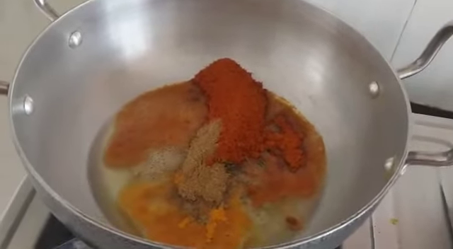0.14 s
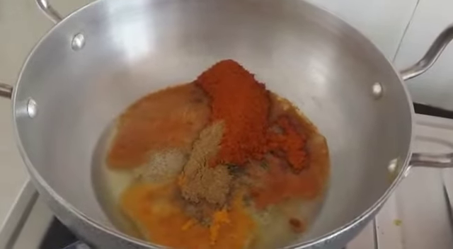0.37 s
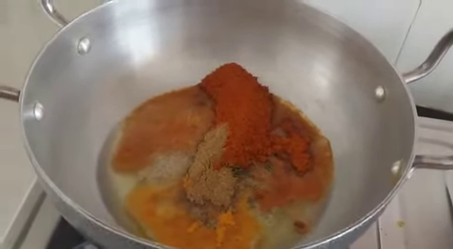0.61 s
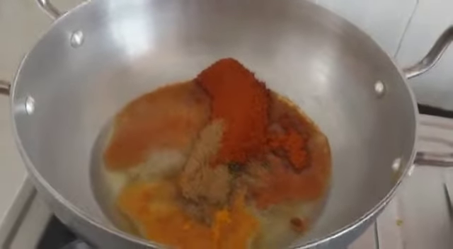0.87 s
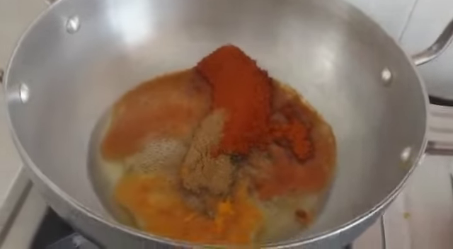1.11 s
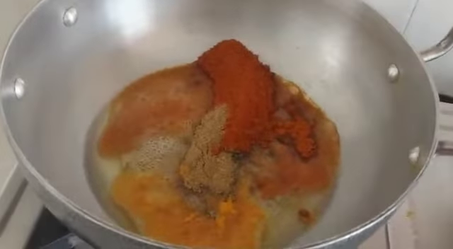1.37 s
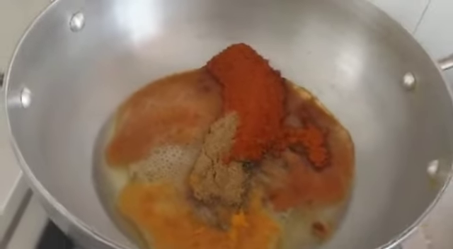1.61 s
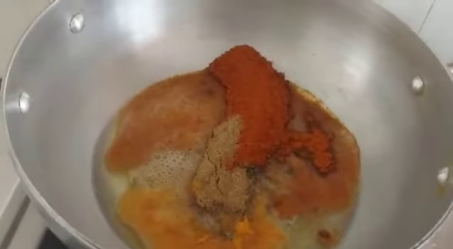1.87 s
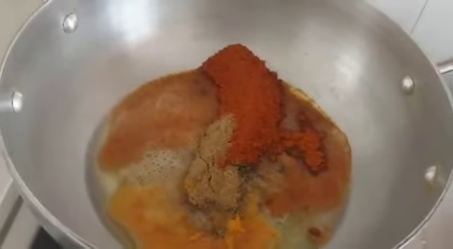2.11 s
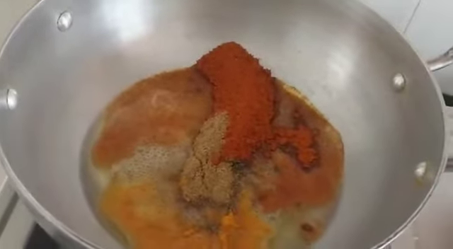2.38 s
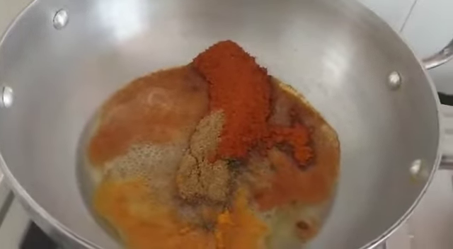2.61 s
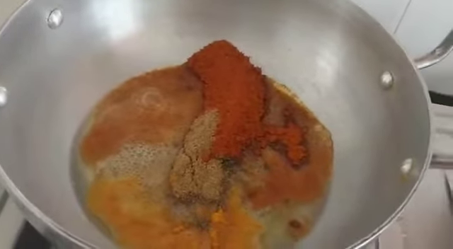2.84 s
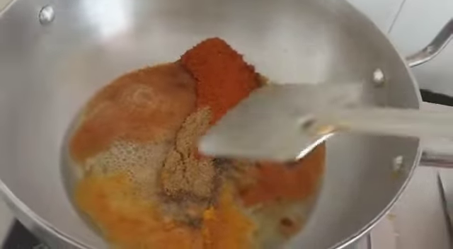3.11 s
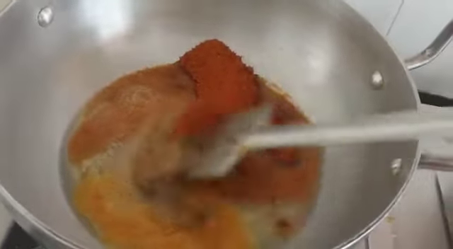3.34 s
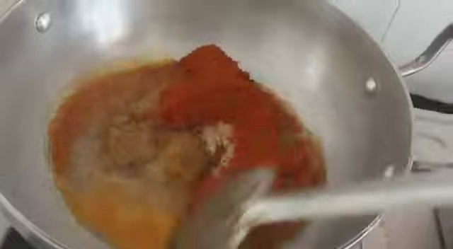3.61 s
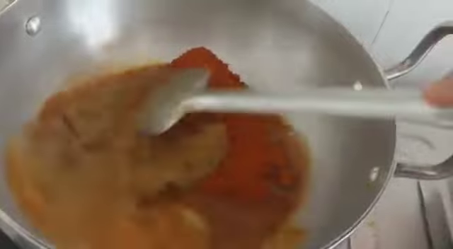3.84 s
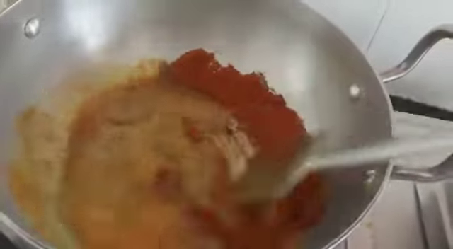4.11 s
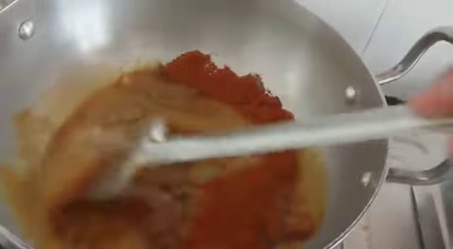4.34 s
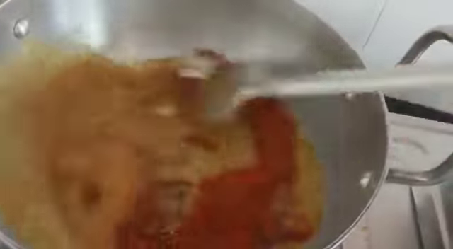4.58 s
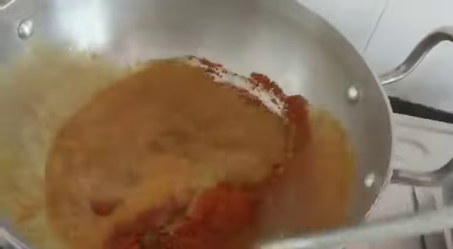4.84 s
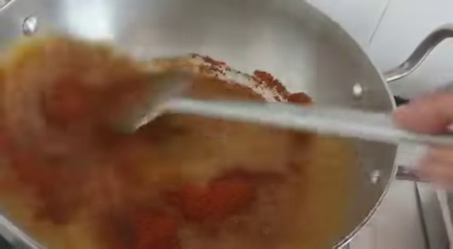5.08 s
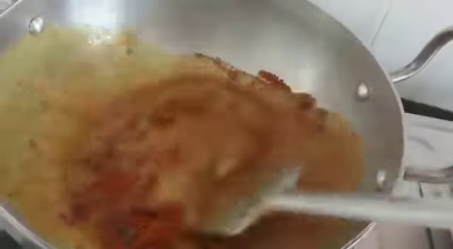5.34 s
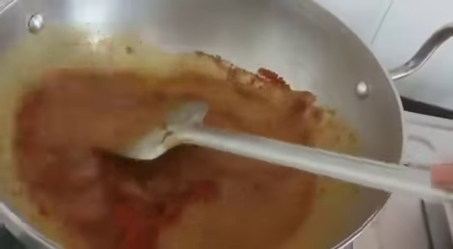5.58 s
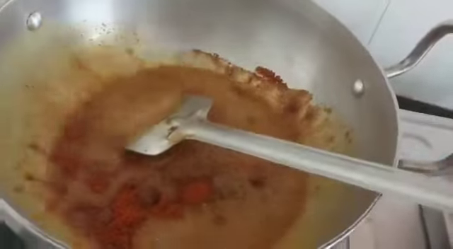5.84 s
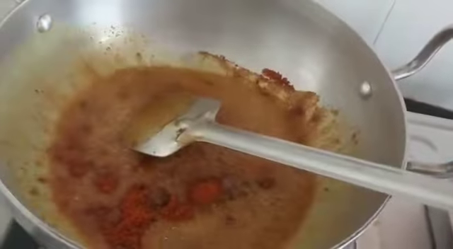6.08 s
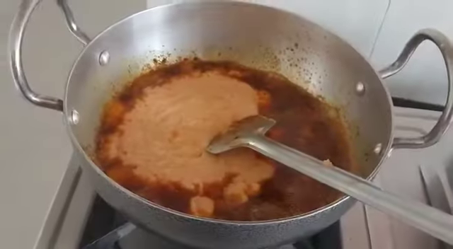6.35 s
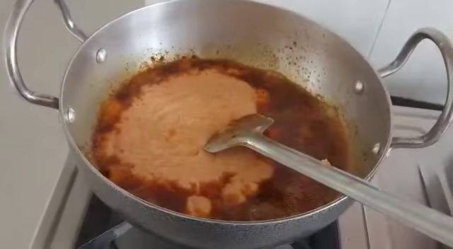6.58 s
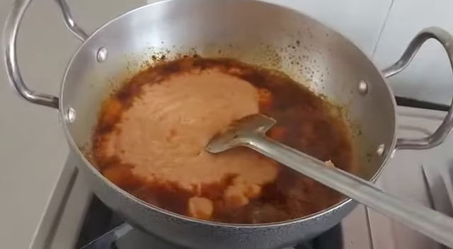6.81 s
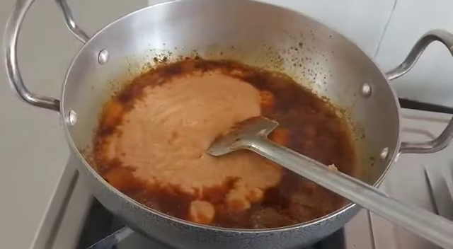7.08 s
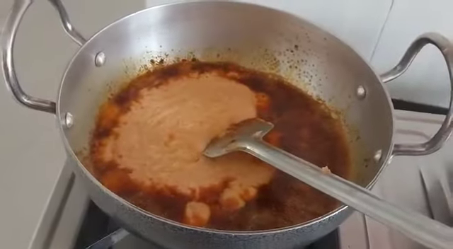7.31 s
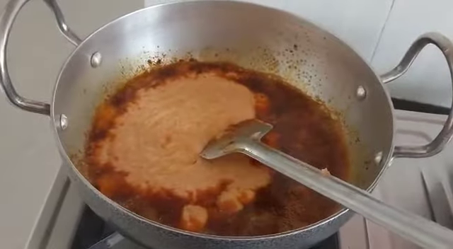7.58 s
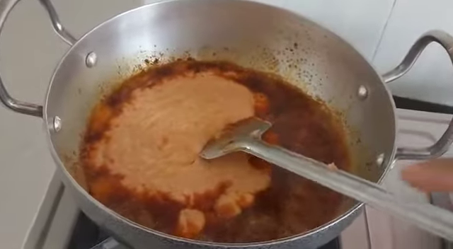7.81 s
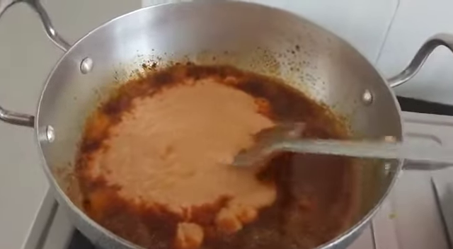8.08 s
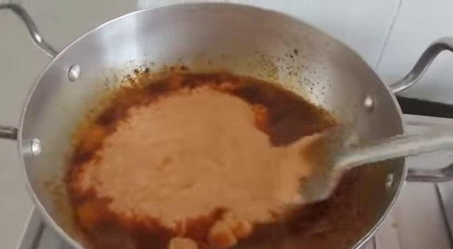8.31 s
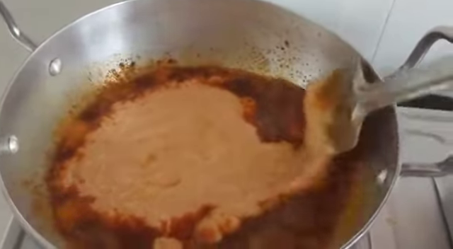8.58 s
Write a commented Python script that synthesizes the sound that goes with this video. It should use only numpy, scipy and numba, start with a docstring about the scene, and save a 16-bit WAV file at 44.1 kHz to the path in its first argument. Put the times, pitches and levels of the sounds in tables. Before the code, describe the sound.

Sparse oil bubbles pop in a metal pan, then a steel spatula clanks and scrapes as spices sizzle loudly, settling into a quieter simmer.

```python
"""Ground spices fry in hot oil in a thin steel pan: at first single bubbles pop as short rising rings,
while puffs of air thump the left microphone of a phone as damped swings. From 3.3 s a steel spatula
strikes, stirs and scrapes, ringing the pan's modes, and the oil hisses up as shaped noise and clicks.
From 6.15 s a wet paste simmers more quietly, its modes damped further and its hiss recoloured.
Throughout, a gas burner rumbles as low noise and a hard kitchen echoes the pan with decaying noise."""
import sys
import numpy as np
from scipy import signal
from scipy.fft import rfft, irfft, next_fast_len
from scipy.io import wavfile
from numba import njit

SR = 44100
rng = np.random.default_rng(int(sys.argv[2]) if len(sys.argv) > 2 else 0)


def store_wav(level_fs):
    """Save 16-bit WAV to argv[1]."""
    pcm = np.round(np.clip(np.atleast_2d(level_fs), -1, 1) * 32767)
    wavfile.write(sys.argv[1], SR, pcm.T.astype(np.int16))


def elevation(decibels):
    """Turn decibel levels (scalar or array-like) into linear amplitude ratios."""
    levels = np.asarray(decibels, float)
    return 10 ** (levels / 20)


N = 383229
TIME = np.arange(N) / SR
PASTE_FROM_S = 6.15


def curve(table, column=1):
    """One column of a table, interpolated along time."""
    rows = np.array(table)
    return np.interp(TIME, rows[:, 0], rows[:, column], left=-99)


def colour(x, spectrum, causal=False):
    """Filter x by a spectrum (Hz, dB); causal keeps attacks sharp (minimum phase)."""
    size = 2 * next_fast_len(x.shape[-1] // 2 + 1)
    hz, db = np.transpose(spectrum)
    log_hz = np.log(np.fft.rfftfreq(size, 1 / SR) + 1)
    gain = elevation(np.interp(log_hz, np.log(hz), db))
    if causal:
        cepstrum = irfft(np.log(gain), size)[:size // 2]
        cepstrum[1:] *= 2
        gain = np.exp(rfft(cepstrum, size))
    return irfft(rfft(x, size) * gain, size)[..., :x.shape[-1]]


def unit(x):
    """Scale to rms 1."""
    return x / np.sqrt(np.mean(x ** 2))


def walk(rate_per_s):
    """Wandering value around 0: normal random levels joined by cosine blends."""
    knots = rng.standard_normal(int(N / SR * rate_per_s) + 2)
    place = TIME * rate_per_s
    k = place.astype(int)
    blend = (1 - np.cos(np.pi * (place - k))) / 2
    return knots[k] * (1 - blend) + knots[k + 1] * blend


def pair(likeness):
    """Two noises with this correlation."""
    mid, side = rng.standard_normal((2, N))
    c = np.clip(likeness, 0, 1)
    return np.sqrt((1 + c) / 2) * mid + np.sqrt((1 - c) / 2) * side * np.array([[1], [-1]])


def crackle(clicks_per_s, spread_db):
    """Random clicks at rms 1, most small and a few large."""
    where, size, sign = rng.random((clicks_per_s * N // SR, 3)).T
    size_db = spread_db * np.minimum(-np.log(size + 1e-9), 3)
    out = np.zeros(N)
    out[(where * N).astype(int)] = (sign - 0.5) * elevation(size_db)
    return unit(out)


def add(out, start_s, wave):
    """Mix a short wave in at start_s."""
    i = int(start_s * SR)
    out[..., i:i + wave.shape[-1]] += wave[..., :N - i]


def fading(times_s, sizes, db_per_s):
    """Envelope that jumps by each size at its time and decays exponentially."""
    kicks = np.zeros(N)
    np.add.at(kicks, (np.array(times_s) * SR).astype(int), sizes)
    return signal.lfilter([1], [1, -elevation(-db_per_s / SR)], kicks)


def swells(middles_s, lengths_s, sizes):
    """Envelope of smooth humps."""
    out = np.zeros(N)
    for middle_s, length_s, size in zip(middles_s, lengths_s, sizes):
        add(out, middle_s - length_s / 2, size * np.hanning(int(length_s * SR)))
    return out


@njit
def resonate(force, hz, fade_per_s):
    """One resonance whose pitch and decay rate may move."""
    out, z, pole = np.empty(len(force), np.complex128), 0j, 0j
    for i in range(len(force)):
        if i % 32 == 0:
            pole = np.exp((2j * np.pi * hz[i] - fade_per_s[i]) / SR)
        z = z * pole + force[i]
        out[i] = z
    return out


# spatula against the pan: start_s, level_db, best_region_hz, crack_db (re level)
BLOWS = [(2.074, -29, 354, -30), (3.282, 0.5, 736, -16.5), (3.283, -10, 1320, -9), (3.284, -11, 3300, -10),
         (3.285, -14, 3880, -19), (3.323, -26, 1300, -20), (3.352, -23, 716, -20), (3.392, -21, 1400, -24),
         (3.524, -23.5, 724, -13), (3.551, -25.5, 867, -1.5), (3.575, -36, 724, 15.5),
         (3.582, -33, 850, 10), (3.605, -21, 880, -20), (3.672, -12, 716, -11), (3.675, -14.5, 1990, -8),
         (3.75, -17.5, 870, -6), (3.916, -21, 1960, -5.5), (3.97, -40, 5100, 11), (4.066, -22.5, 720, -27),
         (4.132, -25.5, 710, -10), (4.211, -32, 950, -17), (4.252, -30, 720, -16), (4.294, -21, 895, -22),
         (4.321, -15, 1740, -28), (4.339, -15, 1700, -20), (4.368, -24, 1600, -22), (4.398, -10, 650, -19),
         (4.487, -14.5, 700, -27), (4.49, -22, 2000, -25), (4.529, -9.5, 710, -32), (4.57, -14.5, 724, -12),
         (4.586, -11.5, 780, -20), (4.609, -15, 720, -10), (4.638, -15, 680, -19), (4.67, -13.5, 730, -7),
         (4.672, -18, 1990, -20), (4.752, -13.5, 2240, -10.5), (4.84, -15.5, 1020, -18),
         (4.884, -13, 720, -31), (4.982, -13.5, 1910, -26), (5.025, -14.5, 905, -22),
         (5.059, -19, 680, -25), (5.1, -24, 700, -19), (5.139, -10, 694, -25), (5.14, -21, 2050, -16),
         (5.159, -22, 1370, -16), (5.182, -15.5, 925, -14), (5.198, -19, 724, -20), (5.222, -22, 703, -7),
         (5.25, -40.5, 716, 17.5), (5.285, -10.5, 740, -32), (5.333, -25, 675, -25),
         (5.392, -17.5, 980, -20), (5.412, -13.5, 990, -18), (5.457, -16, 1150, -15),
         (5.673, -23.5, 950, -4.5), (6.249, -30, 592, -19.5), (6.793, -45, 875, -17),
         (7.019, -36, 644, -19), (7.291, -22.5, 760, -26), (7.654, -41, 850, -20), (7.795, -33, 750, -24),
         (7.81, -30, 900, -24), (7.9, -42, 970, -20), (7.92, -35, 893, -10), (8.036, -38, 850, -18),
         (8.168, -40, 883, -17), (8.271, -35.5, 818, -20), (8.386, -39, 730, -22), (8.496, -46, 888, -22),
         (8.566, -44, 810, -20), (8.606, -37, 500, -23), (8.659, -20, 790, -22), (8.661, -27, 2200, -27)]
# resonances of the pan: pitch_hz, t60_s (free pan), level_db
PAN_MODES = [(359, 0.13, -1), (417, 0.11, -2.5), (527, .04, -23.5), (642, 0.066, -21.5), (668, 0.12, -6),
             (712.7, 0.13, 1), (784, 0.22, -13), (853, 0.056, -1), (905, 0.096, -2.5), (950, 0.057, -4),
             (1010, 0.067, -12), (1020, 0.063, -3), (1100, 0.07, -0.5), (1150, 0.061, -9.5),
             (1256, 0.079, 0.5), (1351, 0.0695, 1.5), (1427, 0.033, 4), (1530, 0.053, -0.5),
             (1668, .07, -5), (1763, 0.045, -2), (1960, 0.061, 2.5), (2096, 0.048, -1), (2220, 0.11, -3.5),
             (2460, 0.087, -9), (2580, 0.073, -16), (2980, 0.16, -9.5), (3146, 0.06, -1.5),
             (3240, 0.099, -5.5), (3720, .08, -12), (3963, 0.08, -3.5), (4470, 0.062, -13), (5100, .1, -10),
             (7700, 0.025, 1), (10700, 0.054, -25), (12300, 0.061, -17)]
# spectrum of a blow's crack: freq_hz, gain_db
CRACK_SPECTRUM = [(800, -21.5), (2000, -11), (4000, 4), (8000, 0.5), (16000, -3.5)]
BEND, BEND_PER_S = 0.015, 14  # blade and oil load the steel: pitch share per unit of walk, knots per s
FREE_UNTIL_S, FREE_DAMPING = 3.38, 1  # the blade does not yet press
OIL_DAMPING, PASTE_DAMPING = 1.68, 1.23  # oil and blade shorten every ring; paste shortens it further
PATTER_DB = 0.5  # coarse bubbles patter on the steel, re their own level


def spatula():
    """Chattering blows and stick-slip clicks ring the pan's modes; each blow also cracks."""
    t = TIME[:2048]
    luck_db = 2.5 * rng.standard_normal((len(BLOWS), len(PAN_MODES)))
    chatter = unit(rng.standard_normal((len(BLOWS), len(t)))) * np.exp(-t / 0.0047) * 0.59
    chatter[:, 0] = 5.8  # the first contact is hard
    pressed = OIL_DAMPING * np.where(TIME > PASTE_FROM_S, PASTE_DAMPING, 1)
    damping = np.where(TIME < FREE_UNTIL_S, FREE_DAMPING, pressed)
    port_phase = rng.standard_normal(len(PAN_MODES))
    patter = elevation(curve(FRYING) + curve(FRYING, column=2) + PATTER_DB) * (TIME > STROKES[0][0])
    slips = crackle(clicks_per_s=900, spread_db=4.0) * elevation(2.56 * walk(45)) * elevation(-41.5)
    load = walk(BEND_PER_S)
    own = [0.93 * walk(BEND_PER_S) for family in range(4)]
    out = np.zeros((2, N))
    for k, (mode_hz, t60_s, mode_db) in enumerate(PAN_MODES):
        # where the blade touches decides which modes sound
        force = slips * rubbing(mode_hz, patter) * elevation(2.5 * walk(30))
        for (start_s, blow_db, blow_hz, _), shake, luck in zip(BLOWS, chatter, luck_db[:, k]):
            slope = 3.5 if start_s < PASTE_FROM_S else 6.0
            drive_db = blow_db - 41.0 + luck + reach(mode_hz, blow_hz, slope)
            add(force, start_s, shake * elevation(drive_db))
        fade_per_s = np.log(1000) * damping / t60_s
        bent_hz = mode_hz * (1 + BEND * (load + own[k % 4]))
        z = elevation(mode_db) * resonate(force, bent_hz, fade_per_s)
        # high modes reach the two ports with unlike phase
        lead = port_phase[k] * min((mode_hz / 1050.0) ** 2, 1.5)
        out += np.imag([z, z * np.exp(1j * lead)])
    for start_s, blow_db, _, crack_db in BLOWS:
        burst = rng.standard_normal((2, len(t))) * np.exp(-t / 0.0074)
        add(out, start_s, elevation(blow_db + crack_db - 5.5) * colour(burst, CRACK_SPECTRUM, causal=True))
    # a small pan radiates no bass
    return colour(out, [(100, -20.5), (400, -3.5), (16000, 5.5)], causal=True)


FOCUS_DB, FOCUS_OCTAVES = 12, 0.16  # boost and width of the best excited region
BELOW_FACTOR = 1.5  # octaves below the region count this much more


def reach(mode_hz, region_hz, db_per_octave):
    """How well a contact drives a mode, in dB: a peak at its own region plus a slope away from it."""
    octaves = np.log2(mode_hz / region_hz)
    away = np.where(octaves < 0, -BELOW_FACTOR * octaves, octaves)
    return FOCUS_DB * np.exp(-(octaves / FOCUS_OCTAVES) ** 2) - db_per_octave * away


# blade dragged over steel: middle_s, length_s, level_db, best_region_hz
STROKES = [(3.35, 0.083, -34, 704), (3.402, 0.18, -33, 860), (3.556, 0.35, -36.5, 890),
           (3.806, 0.4, -44, 900), (4.065, 0.02, -35, 850), (4.323, 0.31, -25.5, 900),
           (4.339, 0.14, -25.5, 1660), (4.416, 0.06, -27, 795), (4.739, 0.22, -26, 1150),
           (4.804, 0.16, -33, 2250), (4.865, 0.092, -21, 1020), (4.872, 0.21, -29, 2040),
           (4.959, 0.094, -22, 1720), (4.905, 0.073, -19.5, 730), (5.036, 0.16, -27, 900),
           (5.106, 0.11, -29.5, 715), (5.17, .09, -29, 2100), (5.166, .08, -38, 1350),
           (5.18, 0.11, -33, 3000), (5.2, 0.16, -32, 715), (5.205, 0.093, -37, 950),
           (5.32, 0.081, -29, 735), (5.477, 0.26, -25, 1050), (5.478, 0.25, -30, 2120),
           (5.552, 0.13, -34.5, 900), (5.632, 0.13, -40, 800), (5.702, 0.08, -27, 950),
           (5.684, 0.045, -37, 2050), (5.786, 0.13, -57, 1100), (7.05, 0.14, -43, 650),
           (7.316, 0.2, -53, 750), (7.663, 0.17, -45.5, 800), (7.806, 0.081, -37, 850),
           (7.677, 0.1, -46, 2600), (7.805, 0.057, -44, 2300), (8.43, 0.49, -72, 800)]
SKID_DB, SKID_DB_PER_S = -24.5, 149.5  # the blade skids on after a blow: level re blow, decay
PATTER_HZ = 900


def rubbing(mode_hz, patter):
    """How hard strokes, skids and pattering bubbles rub one mode."""
    middle_s, length_s, stroke_db, stroke_hz = np.transpose(STROKES)
    start_s, blow_db, blow_hz, _ = np.transpose(BLOWS)
    stroke_gain = elevation(stroke_db + reach(mode_hz, stroke_hz, db_per_octave=7.0))
    skid_gain = elevation(blow_db + SKID_DB + reach(mode_hz, blow_hz, db_per_octave=-1.0))
    patter_gain = elevation(reach(mode_hz, PATTER_HZ, db_per_octave=-2.5) - FOCUS_DB / 2)
    strokes = swells(middle_s, length_s, stroke_gain)
    skids = fading(start_s, skid_gain, SKID_DB_PER_S)
    return strokes + skids + patter * patter_gain


# free rim ringing on or blade squeaking: start_s, length_s, level_db, pitch_hz
RINGS = [(0, 0.097, -57.5, 800), (3.547, 0.083, -43, 12100), (3.578, 0.014, -24, 12140),
         (5.775, 0.51, -59.5, 784)]


def rim():
    """Thin tones from the steel, wavering in level and phase, that hold and then die."""
    out, waver_db, phase = np.zeros(N), 2.0 * walk(25), 3.4 * walk(33)
    for start_s, length_s, level_db, pitch_hz in RINGS:
        level = np.zeros(N)
        add(level, start_s, elevation(level_db) * np.cos(np.linspace(0, np.pi / 2, int(length_s * SR))))
        tone = np.sin(2 * np.pi * pitch_hz * TIME + np.sqrt(pitch_hz / 800) * phase)
        out += level * elevation(waver_db) * tone
    return out


# how hard the oil fries: time_s, hiss_db, coarse_db (re hiss)
FRYING = [(0, -64, -3.5), (.35, -53, -0.5), (.85, -63, 3.5), (1.0, -51.5, -3), (1.35, -55, -7.5),
          (1.7, -58.5, -6), (2.1, -59.5, -4), (2.45, -59, -2), (2.8, -56.5, -38), (3.26, -55.5, -8),
          (3.29, -43, -22), (3.5, -39.5, -5.5), (3.8, -36, -8), (4.1, -35, -9), (4.6, -33.5, -6),
          (4.8, -31.5, -13), (5.1, -34.5, -13), (5.38, -37, -7.5), (5.5, -33, -14), (5.66, -44, -4.5),
          (5.9, -46.5, -14.5), (6.2, -48.5, -15), (6.77, -51, -11), (6.8, -49, -5), (7.15, -49.5, -5),
          (7.4, -47, -4.5), (7.8, -48, -1.5), (8.1, -49, -3.5), (8.69, -46, -1)]
# oil flung onto hot steel spits up at once and settles: start_s, hiss_db, coarse_db
SPLASHES = [(3.284, -36, -25), (3.575, -63, -72), (3.673, -59, -46), (3.749, -65, -31.5), (4.066, -69, -38),
            (4.53, -43, -40), (4.687, -24.5, -59), (4.838, -34, -48), (4.953, -59, -37.5), (5.14, -38, -47),
            (5.265, -35, -37), (5.478, -40, -44), (5.673, -42, -62), (5.885, -55, -76), (7.02, -68, -77),
            (7.29, -48, -64), (7.7, -58, -74), (7.795, -60, -62), (7.99, -54, -77)]
SPLASH_DB_PER_S = 263
CHURN_DB = -20.5  # a stroke churns up coarse bubbles, re its own level


def frying():
    """Gains of fine hiss and coarse bubbling: the heat, the splashes and the churning blade."""
    start_s, hiss_db, coarse_db = np.transpose(SPLASHES)
    middle_s, length_s, stroke_db, _ = np.transpose(STROKES)
    heat = elevation(curve(FRYING))
    churn = swells(middle_s, length_s, elevation(stroke_db + CHURN_DB))
    fine = heat + fading(start_s, elevation(hiss_db), SPLASH_DB_PER_S)
    coarse = heat * elevation(curve(FRYING, column=2)) + churn
    return fine, coarse + fading(start_s, elevation(coarse_db), SPLASH_DB_PER_S)


# spectral shape of the fine hiss: freq_hz, density_db (relative)
HISS_SPECTRUM = [(2000, -38), (3200, -6.5), (4800, -3.5), (6800, -2.5), (8000, -3.5), (9000, -11),
                 (11000, -3.5), (12300, -5), (16500, -12)]
# spectral shape of the coarse bubbling: freq_hz, density_db (relative)
COARSE_SPECTRUM = [(500, -7.5), (1000, -12), (1600, 4), (2200, 5), (3200, 6), (4500, 4.5), (7000, -10)]
# the paste recolours the hiss: freq_hz, gain_db
PASTE_TREBLE = [(4500, 3.5), (5500, -4.5), (9000, 1.5), (14000, 0)]
# the paste recolours the bubbling: freq_hz, gain_db
PASTE_BODY = [(500, 3), (800, 21), (1150, 9), (1600, -2), (2600, 2), (4000, -3)]


def sizzle():
    """Countless tiny bubbles: fine hiss and coarser, lower bubbling that surge together, flicker alone."""
    paste = TIME > PASTE_FROM_S
    surge = walk(16)
    hiss_gain, coarse_gain = frying()
    spit = elevation(-6.0) * np.array([crackle(clicks_per_s=1200, spread_db=5.0) for port in range(2)])
    fine = unit(colour(pair(0.05) + spit, HISS_SPECTRUM))
    fine = fine * hiss_gain * elevation(1.4 * surge + 2.1 * walk(24))
    fine = np.where(paste, colour(fine, PASTE_TREBLE), fine)
    burble = elevation(-3.5) * crackle(clicks_per_s=600, spread_db=2.0)
    coarse = unit(colour(pair(0.021) + burble, COARSE_SPECTRUM))
    coarse = coarse * coarse_gain * elevation(1.5 * surge + 1.5 * walk(20))
    return fine + np.where(paste, colour(coarse, PASTE_BODY), coarse)


# single bubbles bursting: start_s, level_db, initial_pitch_hz, splash_db (re level)
POPS = [(0.078, -35, 11800, -20), (0.1002, -33.5, 5180, -1), (0.1225, -30.5, 2240, 2.5),
        (0.238, -34, 2980, 6), (0.246, -34, 14000, -7), (0.2603, -24, 1386, 7), (0.31, -44.5, 1870, 17.5),
        (0.453, -41, 1800, -5.5), (0.48, -18.5, 3610, -5), (0.5206, -20, 3510, -7), (0.593, -19, 7700, -19),
        (0.607, -34.5, 12400, -6), (0.7214, -25.5, 7950, -5), (0.835, -26, 4460, -0.5),
        (0.898, -45.5, 1900, 7), (0.9392, -40, 1870, 11), (0.9628, -41, 1300, 16), (1.027, -39, 1820, -4),
        (1.0999, -27, 3700, 6.5), (1.167, -39.5, 3730, 7.5), (1.2362, -39.5, 2000, 11),
        (1.3227, -21, 6760, -13.5), (1.343, -26.5, 4600, -4), (1.4766, -28, 5300, -4),
        (1.478, -28, 10800, -15), (1.49, -24, 1940, 1.5), (1.595, -44, 12000, -5),
        (1.669, -22.5, 5400, -12), (1.747, -46, 9500, -3), (1.751, -42, 3170, 4), (1.7926, -23, 3840, -6),
        (1.9055, -26.5, 2220, 3), (1.925, -47, 2410, 16), (1.9487, -41.5, 11300, -1),
        (1.995, -25, 7950, -13.5), (2.0585, -26.5, 3720, -7.5), (2.265, -18, 4070, -14.5),
        (2.309, -26.5, 4140, -4.5), (2.353, -38, 3200, 12), (2.355, -29.5, 13000, -5),
        (2.3981, -30.5, 3040, 3), (2.4237, -21, 3190, -5.5), (2.485, -29, 3200, -2),
        (2.55, -43.5, 1360, 26), (2.5725, -25, 5520, -10), (2.598, -27, 3670, -7), (2.651, -38, 3810, -4),
        (2.6614, -24.5, 7750, -21), (2.6832, -38.5, 6350, 0.5), (2.7156, -37, 6500, -6),
        (2.765, -35, 5070, -11), (2.7743, -29.5, 6900, -14.5), (2.813, -37.5, 3900, -10),
        (2.829, -33, 6050, -12), (2.88, -33, 6800, -7), (2.905, -34.5, 3280, 2.5), (2.969, -23, 3720, -9.5),
        (3.006, -53.5, 3940, 19), (3.141, -36.5, 6600, -15.5), (3.1742, -51, 2070, 10),
        (3.2055, -33.5, 3430, -3.5), (5.884, -29, 5600, -9), (6.1045, -36.5, 5090, -17),
        (6.3903, -41.5, 3900, -18), (6.7431, -34, 6500, -11), (6.793, -48, 2420, 8.5),
        (7.0146, -26, 11500, -23), (7.3907, -43, 2680, 0), (7.5458, -28.5, 10700, -9.5),
        (7.704, -27.5, 8200, -5), (7.9925, -41, 4650, 6), (8.0683, -27.5, 11100, -11),
        (8.206, -36, 4100, 1.5), (8.3705, -32, 3320, 1), (8.481, -33, 4500, -3), (8.527, -39, 2900, -10),
        (8.641, -36, 4000, -15)]
POP_CYCLES = 2.9  # cycles to fall by 1/e


def pops():
    """Each bubble rings a few cycles, rising as it opens, with a short broad splash."""
    out, t = np.zeros((2, N)), TIME[:1024]
    for start_s, level_db, hz, splash_db in POPS:
        cycles = hz * t
        swing = np.sin(2 * np.pi * cycles * (1 + 0.0035 * cycles))
        ring = swing * np.exp(-cycles / POP_CYCLES) * 1.53 * (1 - np.exp(-cycles / 0.72))
        spray = rng.standard_normal((2, len(t))) * np.exp(-t / 0.0038)
        spectrum = [(500, -30), (min(1300, 1.5 * hz), -3), (hz, 0),
                    (2.08 * hz, -7), (3 * hz, -13), (9 * hz, -25)]
        splash = elevation(splash_db) * colour(spray, spectrum, causal=True)
        add(out, start_s, elevation(level_db) * (ring + splash))
    return out


PASTE_FROTH_DB = -9  # fewer single bubbles break through the paste, heard as a lower level


def froth():
    """Scattered small bubbles, each size ringing at its own pitch and coming in swarms."""
    fine, coarse = frying()
    paste_db = PASTE_FROTH_DB * (TIME > PASTE_FROM_S)
    fine, coarse = fine * elevation(-19.5 + paste_db), coarse * elevation(-17.0 + paste_db)
    out = np.zeros((2, N))
    for hz in np.geomspace(1200, 11000, num=16):
        pole = np.exp((2j * np.pi - 1 / 4.4) * hz / SR)  # falls by 1/e in 4.4 cycles
        swarm = crackle(clicks_per_s=60, spread_db=5.5) * elevation(4.2 * walk(8.3))
        z = unit(signal.lfilter([1], [1, -pole], swarm).imag)
        # bubbles sit all over the pan, so they reach the ports a little apart
        lag_samples = int(rng.integers(0, 12))
        out += (coarse if hz < 3600 else fine) * np.array([np.roll(z, lag_samples), z])
    return out


# steam pockets hissing on after a pop: start_s, length_s, level_db, initial_pitch_hz
LEAKS = [(0.269, 0.32, -55, 1980), (0.9, 0.34, -55, 1880), (1.488, 0.35, -56.5, 1780)]
LEAK_SAG, LEAK_WIDTH_HZ = 0.1, 420  # share of the pitch lost by the end, bandwidth


def leaks():
    """Steam as resonant noise: a narrow hiss that starts at once, sinks in pitch and dies away."""
    out = np.zeros((2, N))
    for start_s, length_s, level_db, pitch_hz in LEAKS:
        done = np.linspace(0, 1, int(length_s * SR))
        hz = pitch_hz * (1 - LEAK_SAG * done)
        fade_per_s = np.full(len(done), np.pi * LEAK_WIDTH_HZ)
        jets = [resonate(rng.standard_normal(len(done)), hz, fade_per_s).imag for port in range(2)]
        add(out, start_s, elevation(level_db) * unit(np.array(jets)) * np.sqrt(1 - done))
    return out


# spectral shape of the flame: freq_hz, density_db (relative)
BURNER_SPECTRUM = [(25, -23.5), (40, -2.5), (75, 2), (110, 3), (150, 5.5), (200, 6), (250, -5), (340, -6),
                   (480, -19.5), (700, -32.5)]
# mean level of the flame: time_s, level_db
BURNER_LEVEL = [(0, -52.5), (.39, -44.5), (.65, -50), (.92, -48), (1.3, -54), (2.35, -51.5), (3.2, -53),
                (3.35, -47), (3.75, -45), (4.2, -51.5), (4.5, -45), (4.95, -44.5), (5.4, -50.5),
                (6.25, -51), (6.46, -53.5), (6.7, -56), (7.75, -50.5), (8.15, -51.5), (8.69, -47)]
HUM_HZ, HUM_DB = 147.1, -59


def burner():
    """The gas flame's roar, low noise of fluttering level, and a hum wavering in level and phase."""
    roar = unit(colour(pair(0.88), BURNER_SPECTRUM)) * elevation(curve(BURNER_LEVEL) + 1.5 * walk(15.0))
    hum = elevation(HUM_DB + 2.5 * walk(5)) * np.sin(2 * np.pi * HUM_HZ * TIME + 0.8 * walk(4))
    return roar + hum


# onsets of a dull tone near 750 Hz: start_s, level_db
DULL_TONES = [(0.119, -60), (0.264, -49.5), (0.758, -51.5), (.9, -62), (1.1, -59), (1.489, -59),
              (2.08, -66.5), (2.354, -57.5), (2.549, -63)]
DULL_DB_PER_S = 76


def dull_tone():
    """A faint band of noise near 750 Hz that starts suddenly now and then and fades."""
    start_s, level_db = np.transpose(DULL_TONES)
    spectrum = [(300, -41.0), (550, 1.0), (750, 9.5), (950, -10.5), (1300, -15), (2000, -30.5)]
    tone = unit(colour(pair(0.75), spectrum))
    return tone * fading(start_s, elevation(level_db), DULL_DB_PER_S) * elevation(3.5 * walk(8.9))


# puffs on the left microphone port: time_s, level_db, pitch_hz
THUMPS = [(0.28, -23.5, 214), (0.292, -18, 193), (0.306, -15, 208), (0.317, -13, 188), (0.353, -28, 170),
          (0.387, -31, 180), (0.457, -27.5, 220), (0.847, -27, 174), (.877, -29.5, 188), (0.909, -28, 191),
          (0.944, -22, 189), (0.965, -23, 201.6), (0.9759, -20, 1470), (0.9766, -3.5, 750),
          (.977, -7.5, 253), (1.561, -15.5, 199), (7.011, -35.5, 198), (7.035, -41, 190), (7.8, -38, 240),
          (7.817, -36, 240), (8.31, -42, 181)]


def thumps():
    """Each puff of air is a single damped swing."""
    out, t = np.zeros(N), TIME[:2048]
    for time_s, level_db, hz in THUMPS:
        cycles = hz * t
        swing = np.sin(2 * np.pi * cycles) * cycles * np.exp(-(cycles / 0.58) ** 1.31)
        add(out, time_s - 0.68 / hz, -elevation(level_db + 17.0) * swing)
    return out


# draughts across the left port: middle_s, length_s, level_db
GUSTS = [(0.447, 0.36, -54), (0.933, 0.37, -45), (1.432, 0.15, -56), (2.07, 0.39, -56.5)]


def gusts():
    """Draughts are low noise that swells and flutters strongly."""
    middle_s, length_s, level_db = np.transpose(GUSTS)
    spectrum = [(30, -46), (50, -29), (90, -22), (190, 0.0), (350, -12.5), (800, -34.0)]
    noise = unit(colour(rng.standard_normal(N), spectrum))
    return noise * swells(middle_s, length_s, elevation(level_db)) * elevation(10.5 * walk(24.95))


RUMBLE_HZ, RUMBLE_DB, RUMBLE_END_S = 87, -48.5, 0.536


def air():
    """Puffs, gusts and an opening low rumble of narrow noise, almost all on the left port."""
    spectrum = [(RUMBLE_HZ / 2, -40), (RUMBLE_HZ, 0), (RUMBLE_HZ * 2, -50)]
    rumble = unit(colour(rng.standard_normal(N), spectrum))
    rumble = rumble * elevation(RUMBLE_DB) * np.clip((RUMBLE_END_S - TIME) * 20, 0, 1)
    moving = colour(thumps() + gusts() + rumble, [(25, -22), (70, -0.5)])
    return moving * np.array([[1], [0.04]])


# echo bands: centre_hz, t60_s, level_db
KITCHEN = [(249, 0.98, -2), (707, 0.37, -2.5), (1590, 0.76, -9), (2800, 0.24, -9), (5600, 0.29, -8.5),
           (11930, 0.24, -7.5)]


def kitchen(x):
    """Dense echoes from pan walls and tiles: noise bands decaying exponentially, the lowest slowest."""
    t = TIME[:SR // 2]
    tail = 0
    for hz, t60_s, level_db in KITCHEN:
        spectrum = [(hz / 2, -40), (hz / 1.267, -3), (hz * 1.373, -3), (hz * 2, -40)]
        band = unit(colour(rng.standard_normal((2, len(t))), spectrum))
        scale = elevation(level_db) * np.sqrt(hz / SR / t60_s / SR * 30)
        tail = tail + scale * band * np.exp(-np.log(1000) * t / t60_s)
    tail = tail * (t > 0.0025)
    return signal.fftconvolve(x.mean(axis=0)[None], tail, axes=1)[:, :N]


PASTE_PAN_DB = 1  # left over right, once the paste simmers


def scene():
    """Steel and single bubbles echo in the kitchen; hiss, flame and air arrive as they are."""
    steel = spatula() + rim()
    bubbles = pops() + froth() + leaks()
    echo = kitchen(elevation(6.5) * bubbles + elevation(-1.5) * steel)
    mix = bubbles + steel + echo + elevation(-3.5) * sizzle() + burner() + dull_tone()
    lean_db = PASTE_PAN_DB / 2 * (TIME > PASTE_FROM_S) * np.array([[1], [-1]])
    return mix * elevation(lean_db) + air()


def roll_off(x):
    """The treble ends steeply here."""
    return signal.sosfilt(signal.butter(12, 16650, fs=SR, output="sos"), x)


# treble notch of the left port: freq_hz, left_minus_right_db
LEFT_PORT = [(60, -2), (400, -3.5), (1300, -1), (4400, 0.5), (6800, -2), (7600, -6.5), (8300, -30.5),
             (9500, -26), (12000, -9.5), (16000, -5.5)]
TOP_HZ = 15950


def record(dry):
    """Left port is notched, right hears 4 samples later; both lose deep bass, clip, lose the very top."""
    ports = np.array([colour(dry[0], LEFT_PORT), np.roll(dry[1], shift=4)])
    ports = colour(ports, [(15, -53), (35, -2.5), (60, -0.5), (16000, 2.5)])
    ports = np.clip(ports, -1, 1)
    finished = colour(ports, [(TOP_HZ, 0), (TOP_HZ + 150, -80)])
    return roll_off(finished)


dry = scene()
out = record(dry)
store_wav(out)
```